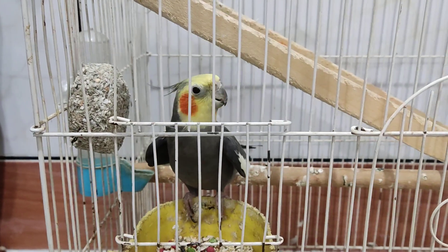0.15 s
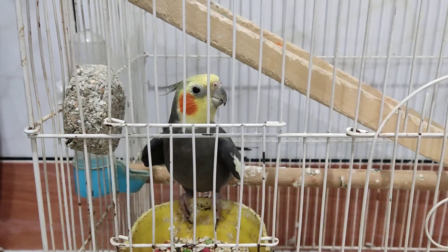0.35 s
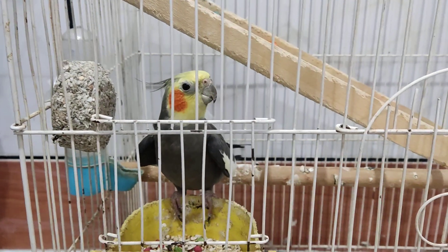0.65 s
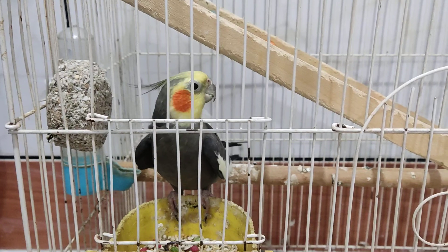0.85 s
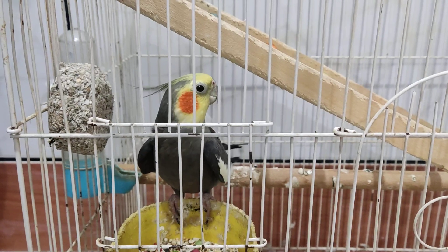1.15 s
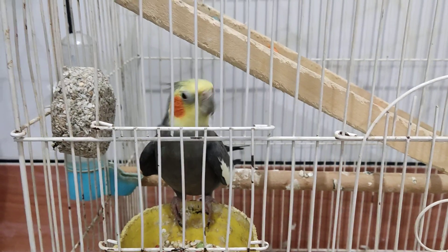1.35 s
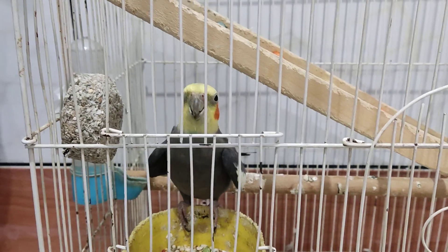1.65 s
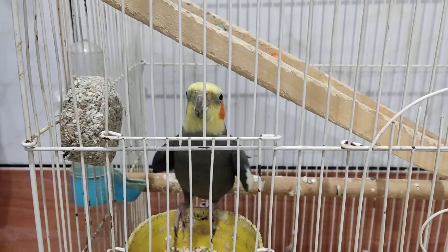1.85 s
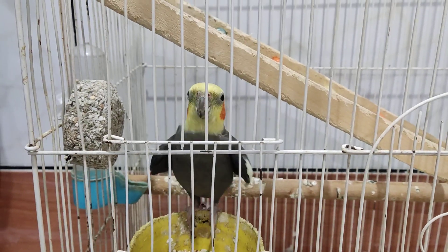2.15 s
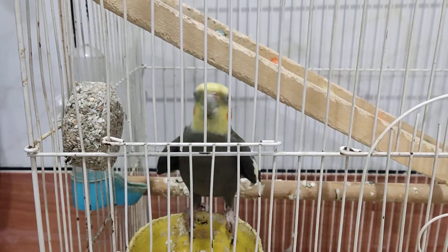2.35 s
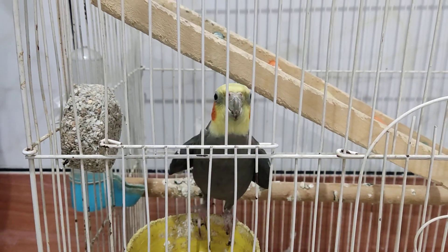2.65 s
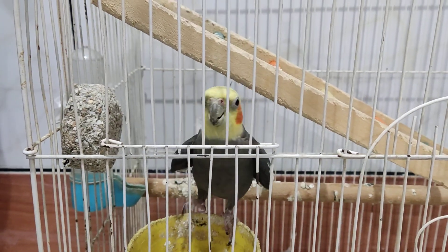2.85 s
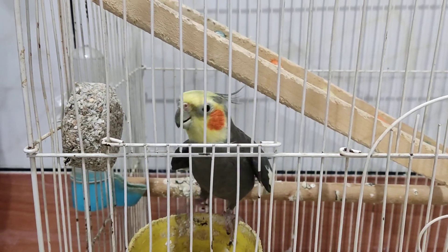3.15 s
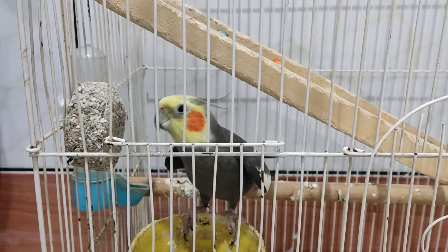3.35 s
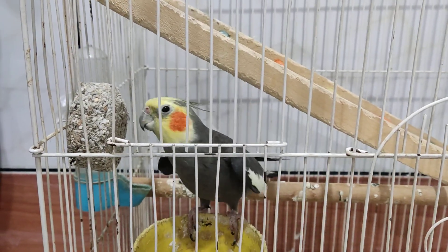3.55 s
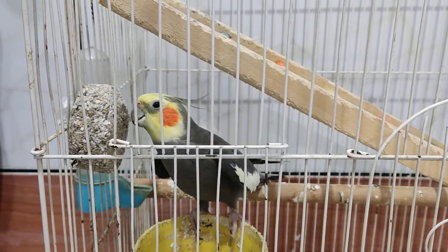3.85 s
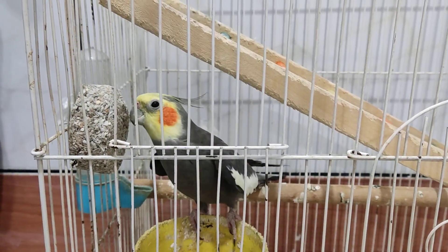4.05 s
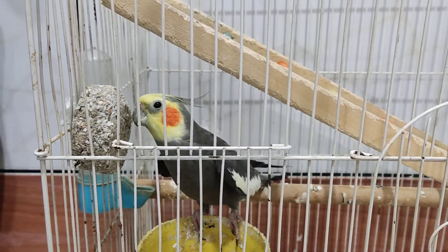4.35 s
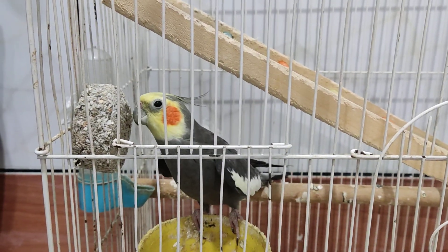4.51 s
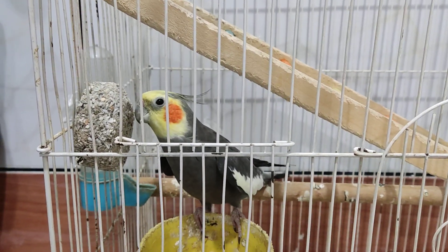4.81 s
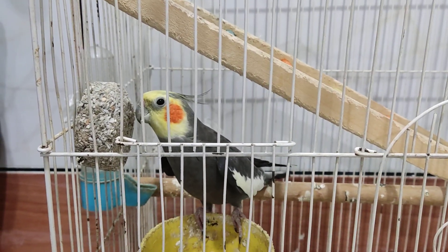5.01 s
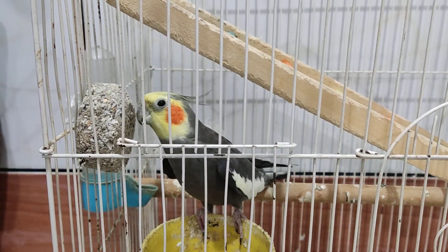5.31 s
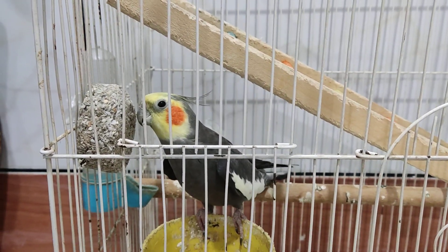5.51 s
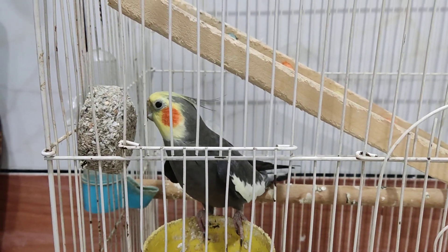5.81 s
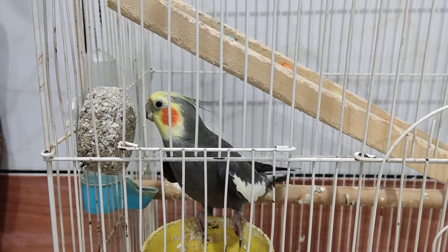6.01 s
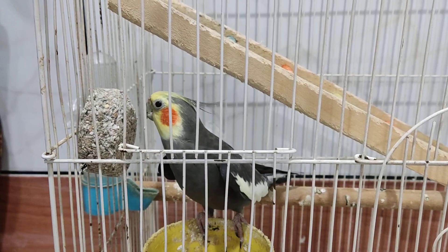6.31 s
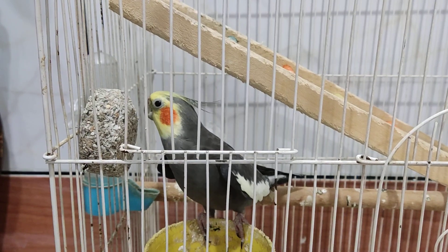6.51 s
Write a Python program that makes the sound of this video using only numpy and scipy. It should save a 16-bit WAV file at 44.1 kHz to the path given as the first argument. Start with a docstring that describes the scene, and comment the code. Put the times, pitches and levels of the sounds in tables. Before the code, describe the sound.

Shrill, quick whistles from a nearby cockatiel swoop up and down, each ringing briefly in a tiled room. The bird gives a single two-part chirp, waits a second, then repeats it in a fast, even string. It stops for about two seconds, leaving a few soft cage taps, a very faint far bird, low rumble and microphone hiss, before whistling a few more times.

```python
"""In a bare tiled room, a caged cockatiel sings a little to the right of two close microphone ports.
Its syrinx (a bird's voice box) makes rising and falling whistles, rich in overtones, with breath and
tiny ticks. The room rings on for over half a second. Between phrases come faint taps in the cage
and a far whistle, over a steady rumble and microphone hiss."""
import sys
import numpy as np
from scipy import signal
from scipy.fft import rfft, irfft, next_fast_len
from scipy.io import wavfile
from scipy.ndimage import uniform_filter1d, minimum_filter1d

SR = 44100
rng = np.random.default_rng(int(sys.argv[2]) if len(sys.argv) > 2 else 0)


def wrap_up_sound(samples):
    """Save the sound to the file named by the first command line argument, as 16-bit audio."""
    columns = np.atleast_2d(samples).T
    # keep every value between -1 and 1, then stretch to whole-number steps
    tamed = np.clip(columns, -1, 1)
    steps = np.round(tamed * 32767).astype(np.int16)
    wavfile.write(sys.argv[1], SR, steps)


N = 294147
LEAD = SR // 5   # samples sounding before the start
CUTOFF_HZ = 15500


def from_db(db):
    """Decibels to gain."""
    return 10 ** (np.asarray(db) / 20)


def rms_one(x):
    """Scale to an average strength (rms) of 1."""
    return x / np.sqrt(np.mean(x ** 2) + 1e-20)


def in_time(rows):
    """Read a (time_s, value) curve at every sample."""
    return np.interp(np.arange(N) / SR, *np.transpose(rows))


def at_hz(points, hz):
    """Read a (pitch_hz, value) curve, spaced by octaves."""
    pitches, values = np.transpose(points)
    return np.interp(np.log(np.maximum(hz, 1)), np.log(pitches), values)


def coloured(x, spectrum):
    """Turn each pitch up or down by a (pitch_hz, gain_db) curve."""
    size = next_fast_len(x.shape[-1])
    gain = from_db(at_hz(spectrum, np.arange(size // 2 + 1) * SR / size))
    return irfft(rfft(x, size) * gain, size)[..., :x.shape[-1]]


def wander(rate_hz, size):
    """A smooth random wobble, about 1 in size."""
    r = np.exp(-2 * np.pi * rate_hz / SR)
    smooth = signal.lfilter([1], [1, -2 * r, r * r], rng.standard_normal(size + SR // 4))
    return rms_one(smooth[SR // 4:])


def ring(clicks, hz, fade_s):
    """Each click starts a tone that dies by 60 dB in fade_s."""
    r, w = from_db(-60 / (fade_s * SR)), 2 * np.pi * hz / SR
    return signal.lfilter([0, np.sin(w)], [1, -2 * r * np.cos(w), r * r], clicks + 1e-18)


def at_ports(x, left_db=-6.0, lag_s=0.00018):
    """The left port hears the bird later and softer."""
    return np.array([from_db(left_db) * np.roll(x, round(lag_s * SR)), x])


def stereo_noise(spectrum, alike, lumps_db, lumps_hz):
    """Noise, partly shared by both ports, in slow lumps."""
    mid, side = coloured(rng.standard_normal((2, N)), spectrum)
    both = np.sqrt(1 + alike) * mid + np.sqrt(1 - alike) * side * [[1], [-1]]
    return rms_one(both * from_db(lumps_db * wander(lumps_hz, N)))


# The rumble's tone: pitch_hz, gain_db
RUMBLE_TONE = [(12, -22), (25, -2.5), (45, -0.5), (75, -3.5), (180, -17), (360, -21.5), (500, -25),
               (700, -53.5)]
# Its loudness: time_s, level_db
RUMBLE_LEVEL = [(0, -59.5), (2.3, -58), (2.7, -60), (5.9, -63), (6.1, -59.5), (6.67, -59)]


def rumble():
    """A faint, deep noise."""
    return from_db(in_time(RUMBLE_LEVEL)) * stereo_noise(RUMBLE_TONE, alike=0.13, lumps_db=-0.5, lumps_hz=8)


# The hiss's tone: pitch_hz, gain_db
HISS_TONE = [(240, -49), (400, -5), (857, -3.5), (954, -8), (1440, -8.5), (2110, -6.5), (3490, -8.5),
             (3820, -8), (7590, -4), (9250, -7.5), (10800, -4), (13800, -11.5), (14600, -23),
             (15300, -47.5)]
# Its loudness: time_s, level_db
HISS_LEVEL = [(0, -53.5), (.6, -59.5), (.78, -58.5), (1, -60), (6.67, -62.5)]


def hiss():
    """The microphone's own noise."""
    return from_db(in_time(HISS_LEVEL)) * stereo_noise(HISS_TONE, alike=0.03, lumps_db=-1.65, lumps_hz=6)


# Rising whistles. Harmonic 1 is the pitch itself; 2 and up are its overtones.
# start_s, climb_s, surge_s, hold_s, early_hz, late_hz, top_hz, held_hz,
# first_harmonic_db, second_harmonic_db, upper_harmonics_db, climb_boost_db, rasp_db
RISES = [(0.072, 0.076, 0.0082, 0.016, 1352, 1530, 1870, 1922, -10.5, -0.5, -10, -4.5, -31),
         (1.374, 0.066, 0.0074, 0.013, 1365, 1507, 1943, 1923, -12.5, -8, -16, 0.0, -32),
         (1.656, 0.061, 0.016, 0.0087, 1389, 1608, 2154, 2170, -13, -8, -13.5, -0.5, -34),
         (1.939, 0.053, 0.021, 0.0096, 1444, 1509, 2167, 2130, -14.5, -9, -19, 1.5, -38),
         (2.214, 0.057, .017, 0.007, 1410, 1643, 2134, 2200, -13, -7, -14, 1, -36),
         (2.505, 0.063, 0.014, 0.0091, 1370, 1573, 2001, 2140, -15, -6.5, -17.5, 3, -27.5),
         (2.8, 0.063, 0.019, 0.0051, 1364, 1535, 2056, 2220, -15, -5, -16, 2.5, -25.5),
         (3.111, 0.063, 0.023, 0.011, 1347, 1550, 2029, 2130, -14.5, -5, -15.5, 1, -37),
         (3.427, .078, 0.01, .018, 1390, 1555, 1862, 2006, -11, -3, -13.5, -4, -30),
         (3.754, .141, .018, 0.02, 1450, 1557, 1853, 1837, -11, -6.5, -15, -3.5, -30),
         (6.016, 0.063, 0.004, 0.024, 1329, 1514, 1941, 2107, -17, -9, -20, 2.5, -30),
         (6.279, 0.057, 0.015, 0.0088, 1354, 1582, 2120, 2140, -11, -7, -15, -3, -31),
         (6.55, 0.052, 0.013, 0.025, 1410, 1537, 2057, 2226, -12.5, -9, -14, -4, -33)]
# Added to a rise's harmonics at each stage (open, voiced, early, late, bend, top, held, flick):
# first_db, second_db, upper_db
RISE_STAGES = [(-35, -37.5, -29.5), (-16, -37.5, -26), (-17, -29.5, -22), (-12, -25.5, -11.5),
               (-9, -10, -4), (0, 1, 1), (-9, -14, -10), (-19, -33.5, -35.5)]


def rise(start_s, climb_s, surge_s, hold_s, early_hz, late_hz, top_hz, held_hz, *levels_db):
    """Rows of time, pitch and three levels: a climb, a surge to the loud top, a hold, an upward flick."""
    open_hz, voiced_hz, bend_hz, flick_hz = 1096, 1267, 1766, 2920
    voiced_s, flick_s = .009, 0.0073
    ending_s = np.cumsum([climb_s, surge_s, hold_s, flick_s])
    times = start_s + np.r_[0, voiced_s, .35 * climb_s, .7 * climb_s, ending_s]
    pitch = [open_hz, voiced_hz, early_hz, late_hz, bend_hz, top_hz, held_hz, flick_hz]
    stages_db = np.add(RISE_STAGES, levels_db[:3], dtype=float)
    stages_db[:4] += levels_db[3]   # climb boost
    return np.column_stack([times, pitch, stages_db])


# Falling whistles; the first ends before time zero, so only its echo is heard.
# start_s, dive_s, slide_s, drop_s, start_hz, mid_dive_hz, knee_hz, shoulder_hz,
# first_harmonic_db, second_harmonic_db, upper_harmonics_db, dive_boost_db
FALLS = [(-.120, 0.021, 0.036, 0.032, 2900, 2400, 2080, 1754, -11.5, -6, -16.5, 1),
         (0.232, 0.023, 0.029, 0.029, 3006, 2603, 1949, 1746, -14, -8.5, -15, 0),
         (1.510, 0.01, 0.03, 0.032, 2520, 2297, 2119, 1858, -13.5, -5, -17, 1.5),
         (1.785, 0.016, 0.034, 0.037, 2906, 2483, 2110, 1849, -13, -6.5, -16.5, -2),
         (2.067, 0.016, 0.036, 0.026, 2980, 2572, 2101, 1820, -12.5, -7, -17.5, 1.5),
         (2.353, 0.021, 0.029, 0.03, 2910, 2440, 1990, 1801, -13.5, -7, -18, -2),
         (2.646, 0.016, 0.033, 0.031, 2980, 2477, 2070, 1730, -14, -5.5, -18.5, -0.5),
         (2.955, .018, .034, .028, 3090, 2443, 1986, 1764, -14, -7, -18, -1),
         (3.271, .020, .029, 0.021, 2960, 2392, 1945, 1780, -14, -7.5, -18, 0.0),
         (3.598, 0.018, 0.017, 0.037, 3405, 2940, 2620, 1966, -15.5, -11.5, -23.5, 1.5),
         (6.146, 0.0068, 0.035, 0.03, 2630, 2265, 2130, 1798, -14.5, -8, -22, 0.0),
         (6.404, .016, 0.032, 0.032, 2840, 2253, 1995, 1872, -13.5, -7.5, -19.5, 0.0)]
# Added to a fall's harmonics at each stage (open, mid-dive, knee, shoulder, mid-drop, shut):
# first_db, second_db, upper_db
FALL_STAGES = [(-6.5, -28.5, -23), (-4.5, -6.5, -4), (-6, -2, 0.5), (-4.5, -2.5, -0.5),
               (-13.5, -26.5, -17.5), (-32.5, -36.5, -39)]


def fall(start_s, dive_s, slide_s, drop_s, start_hz, mid_dive_hz, knee_hz, shoulder_hz, *levels_db):
    """The same rows for a fast dive, a loud slow slide from knee to shoulder, and a fading drop."""
    mid_drop_hz, shut_hz = 1481, 1130
    times = start_s + np.cumsum([0, dive_s / 2, dive_s / 2, slide_s, drop_s / 2, drop_s / 2])
    pitch = [start_hz, mid_dive_hz, knee_hz, shoulder_hz, mid_drop_hz, shut_hz]
    stages_db = np.add(FALL_STAGES, levels_db[:3], dtype=float)
    stages_db[:2] += levels_db[3]   # dive boost
    return np.column_stack([times, pitch, stages_db])


# How the windpipe shapes harmonics 1 and 2: pitch_hz, gain_db
WINDPIPE = [(1200, -0.5), (1550, -0.5), (1850, 1), (2100, -2.5), (2400, -7), (2750, 2), (3150, -1.5),
            (3600, 1), (3900, -2), (4250, 0), (4900, -4), (5600, 1.5)]
# How throat and beak shape the higher harmonics and the rasps: pitch_hz, gain_db
BEAK = [(350, -56), (800, -15.5), (1800, -21), (2700, -5.5), (3900, 2.5), (4800, 1), (5700, 4.5),
        (6700, -7), (7600, 1.44), (8600, -12), (9600, -16.5), (11300, -14), (12500, -35.5), (14000, -27),
        (15500, -31.5)]
# The bird turns its head and shifts about:
# time_s, left_over_right_db, lag_factor, tilt_db (per harmonic above the third)
HEAD_TURN = [(0.1, -3.5, 0.82, 0.5), (0.3, -2.5, 0.8, -0.5), (1.4, -5.5, 0.95, 1.7), (2.0, -5, 1.084, 1.15),
             (2.6, -7.5, 0.89, 1.13), (3.2, -6.5, 1.027, 1), (3.6, -9, 1.11, 2.3),
             (3.899, -13.5, 1.13, 2.7), (6.05, -8, 1.02, 1.4), (6.6, -5.5, 1.17, 1.4)]
# Extra level at the left port: pitch_hz, gain_db
LEFT_GAIN = [(1200, 3), (2000, 3.5), (4000, -1), (7000, -12), (10000, 3), (13000, 2.5)]
# How far the left port's wave trails, before lag_factor: pitch_hz, lag_radians
LEFT_LAG = [(1400, 1.3), (2300, 2.02), (4100, 4.28), (7300, 4.93), (9600, 7.53), (12000, 8.72)]


def harmonics(i, middle_s, hz, phase, levels_db, wobbles):
    """One whistle at samples i: eleven harmonics pass through throat and beak to both ports."""
    turn_s, *turns = np.transpose(HEAD_TURN)
    left_db, lag_factor, tilt_db = [np.interp(middle_s, turn_s, c) for c in turns]
    out = np.zeros((2, len(i)))
    for k in range(1, 12):
        if k < 3:
            level_db = levels_db[k - 1] + at_hz(WINDPIPE, k * hz)
        else:
            level_db = levels_db[2] + at_hz(BEAK, k * hz) + tilt_db * (k - 3)
        waver_db = .6 * min(k, 6) * wobbles[:, (i + k * SR // 2) % N]   # each wavers on its own
        right = from_db(level_db + waver_db[0]) * (k * hz < CUTOFF_HZ)
        left = right * from_db(waver_db[1] + left_db + at_hz(LEFT_GAIN, k * hz))
        own_phase = k * phase + 0.66 * k ** 2   # the throat delays each harmonic differently
        out[0, i - i[0]] = left * np.sin(own_phase - lag_factor * at_hz(LEFT_LAG, k * hz)) + out[0]
        out[1] += right * np.sin(own_phase)
    return out


# Air rushing past the syrinx: pitch_hz, gain_db
AIR_TONE = [(500, -54), (1000, -50), (2000, -25.5), (4000, -8), (6500, -7), (8000, 9), (9200, -13),
            (13000, -15.5), (15500, -23)]


def song(flutter_db=1.5, edge_s=0.00042, glide_s=0.001, jitter=.011, air_db=-18, tick_db=-41.5):
    """The syrinx whistles and lets air past; its slack folds tick at the low end of each note."""
    whistles, effort, clicks = np.zeros((2, N + LEAD)), np.zeros(N + LEAD), np.zeros(N + LEAD)
    shake, flutter = wander(400, N + LEAD), wander(150, N + LEAD)
    wobbles = np.array([wander(68, N), wander(40, N)])
    inset = round(0.012 * SR)   # ticks sit just inside the note
    for note in [rise(*row) for row in RISES] + [fall(*row) for row in FALLS]:
        times, *curves = np.transpose(note)
        i = np.arange(round(times[0] * SR), round(times[-1] * SR)) + LEAD
        t = (i - LEAD) / SR
        # muscles round the corners of a glide
        hz, *levels_db = [uniform_filter1d(np.interp(t, times, c), round(glide_s * SR)) for c in curves]
        phase = 2 * np.pi * np.cumsum(hz * (1 + jitter * shake[i])) / SR
        fade = np.clip(np.minimum(t - times[0], times[-1] - t) / edge_s, 0, 1)
        loudness = fade * from_db(flutter_db * flutter[i])
        whistles[:, i] += loudness * harmonics(i, times.mean(), hz, phase, levels_db, wobbles)
        effort[i] = loudness * from_db(.75 * levels_db[2])   # soft passages are the breathier ones
        clicks[i[[inset, -1 - inset]]] = from_db(tick_db) * (hz[[0, -1]] < 1600)
    air = from_db(air_db) * effort * rms_one(coloured(rng.standard_normal(N + LEAD), AIR_TONE))
    return whistles + at_ports(air + ring(clicks, hz=750, fade_s=.007))


def rasps(grain_db=2.0, top_length_s=0.019, dive_db=-33.5):
    """Hoarse, grainy breath as the syrinx closes at the top of a rise and opens for a fall."""
    t, swell = (np.arange(N + LEAD) - LEAD) / SR, 0
    tops = [(sum(row[:4]), top_length_s, row[-1]) for row in RISES]
    dives = [(row[0], row[1], dive_db) for row in FALLS]
    long_breath = (3.93, .074, -23)   # ends the second phrase
    for start_s, length_s, level_db in tops + dives + [long_breath]:
        progress = np.clip((t - start_s) / length_s, 0, 1)
        swell = swell + from_db(level_db) * np.sin(np.pi * progress) ** 0.32
    grains = rng.standard_normal(N + LEAD) * from_db(grain_db * wander(500, N + LEAD))
    return at_ports(swell * rms_one(coloured(grains, BEAK)))


# How long the room takes to die away by 60 dB: pitch_hz, fade_s
ROOM_FADE = [(1300, 0.61), (2700, 0.6), (5400, 0.59), (10700, 0.59)]
# The echo's tone: pitch_hz, gain_db
ROOM_TONE = [(1300, -1.5), (1900, 16), (2300, 7), (2800, 1.5), (3300, 3.5), (3900, 9), (4800, -2.5),
             (5600, -3), (7800, 10.5), (9500, -2), (12000, -2.5)]


def room(x, alike=0.099, early_db=13.0, early_s=0.0067):
    """Echoes blur into fading bands of noise; near walls make the first ones stronger."""
    t, echo = np.arange(SR) / SR, 0
    shared, left, right = rng.standard_normal((3, SR))
    noise = alike ** .5 * shared + (1 - alike) ** .5 * np.array([left, right])
    for low_hz in 950 * 2 ** np.arange(4):
        octave = signal.butter(2, [low_hz, 2 * low_hz], "band", fs=SR, output="sos")
        fade = from_db(-60 * t / at_hz(ROOM_FADE, low_hz * 2 ** .5))
        echo = echo + signal.sosfilt(octave, noise) * fade
    echo *= from_db(early_db * np.exp(-t / early_s))
    echo *= np.clip(t / 0.001 - 1, 0, 1)   # the nearest wall answers after 1 ms
    return signal.fftconvolve(coloured(x, ROOM_TONE)[None], echo / np.sqrt(SR / 20), axes=1)[:, :len(x)]


# Taps in the cage: start_s, level_db, pitch_hz, snap_over_knock_db
CAGE_TAPS = [(1.11, -47.5, 383, -12), (4.582, -43, 1213, -17), (5.198, -48.5, 1476, -9.5),
             (5.256, -52, 644, 8.5), (5.822, -46.5, 440, -5), (5.858, -53, 311, -6.5)]


def taps():
    """Claw or seed on plastic: a dull knock with a short snap."""
    out = np.zeros(N + LEAD)
    for start_s, level_db, hz, snap_db in CAGE_TAPS:
        click = np.zeros(SR // 20)
        click[0] = from_db(level_db)
        knock = ring(click, hz, fade_s=0.012)
        snap = from_db(snap_db) * ring(click, hz=2100, fade_s=0.00302)
        out[round(start_s * SR) + LEAD:][:len(click)] += knock + snap
    return out


# The far bird's call: time_s, pitch_hz, level_db
FAR_WHISTLE = [(4.82, 3900, -86), (4.92, 4200, -79), (5.02, 4370, -79), (5.12, 4200, -76),
               (5.201, 3940, -86)]


def far_bird():
    """A faint whistle from outside arches up and down."""
    times, hz, level_db = np.transpose(FAR_WHISTLE)
    t = np.arange(N) / SR
    pitch_hz = np.interp(t, times, hz) + 30 * wander(80, N)
    loudness = from_db(np.interp(t, times, level_db) + 3.1 * wander(30.3, N))
    return np.sin(2 * np.pi * np.cumsum(pitch_hz) / SR) * loudness * (t > times[0]) * (t < times[-1])


def scene():
    """Bird and cage echo in the room, over the quiet background."""
    close = song() + rasps() + taps()
    echo = room(close[1]) * from_db([[-9.5], [-8.0]])   # left, right
    return (close + echo)[:, LEAD:] + rumble() + hiss() + far_bird()


def record(dry, ceiling=.93):
    """The highest treble is cut; a limiter looking 3 ms ahead holds down the peaks."""
    treble_cut = signal.cheby2(12, 70, CUTOFF_HZ, fs=SR, output="sos")
    cut = signal.sosfilt(treble_cut, dry)
    allowed = np.minimum(1, ceiling / (np.abs(cut).max(0) + 1e-9))
    gain = uniform_filter1d(minimum_filter1d(allowed, size=265), size=133)
    return signal.sosfilt(treble_cut, cut * gain)


dry = scene()
out = record(dry)
wrap_up_sound(out)
```